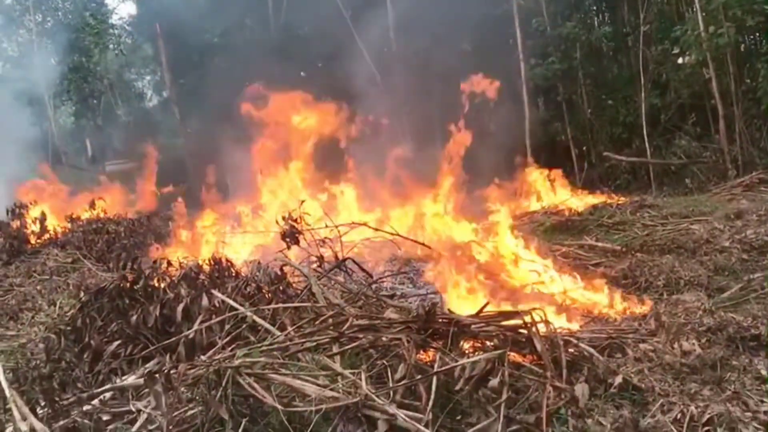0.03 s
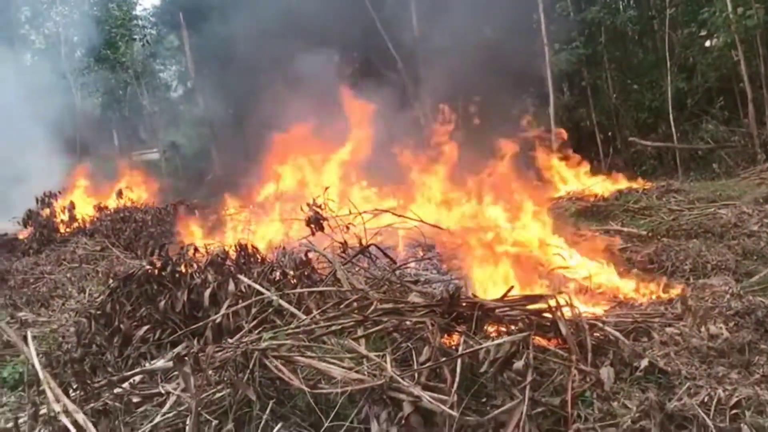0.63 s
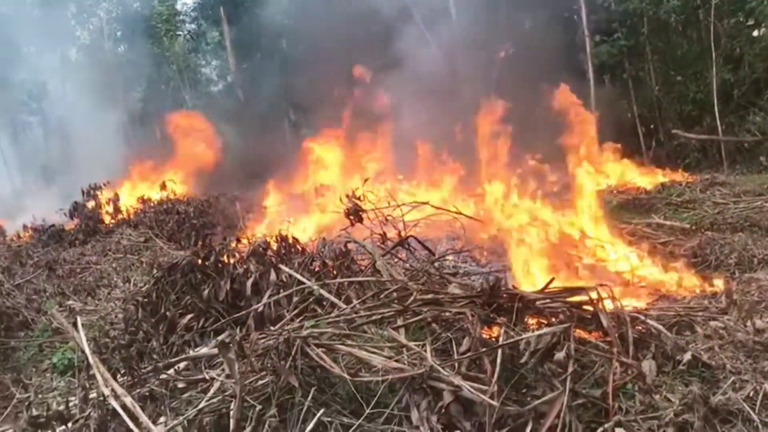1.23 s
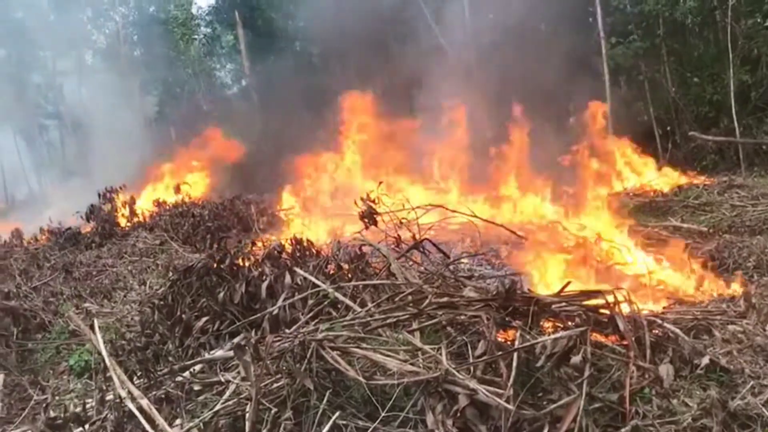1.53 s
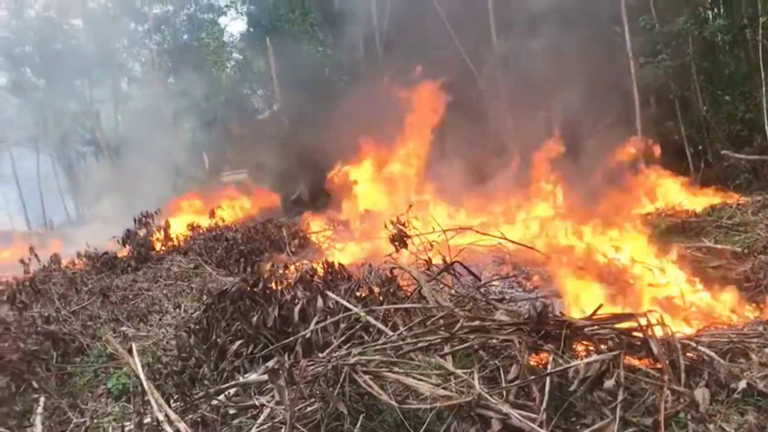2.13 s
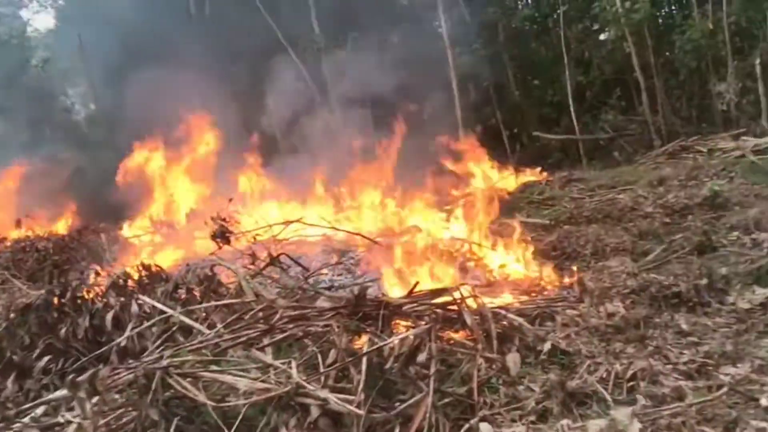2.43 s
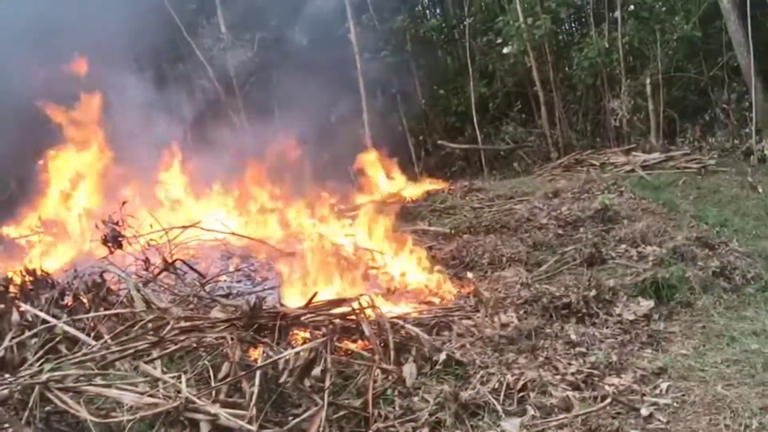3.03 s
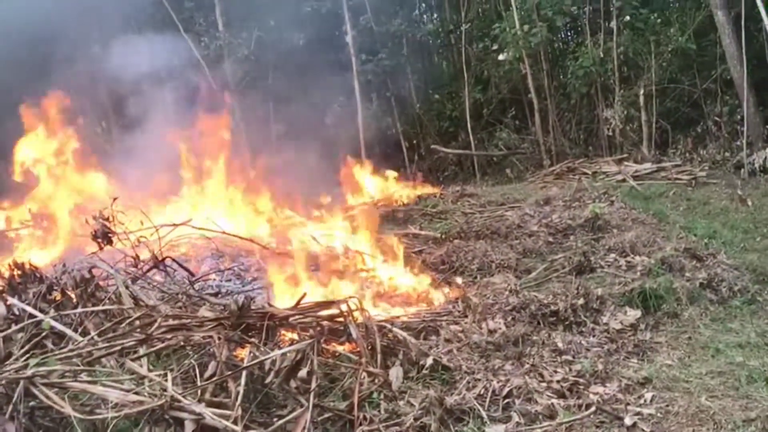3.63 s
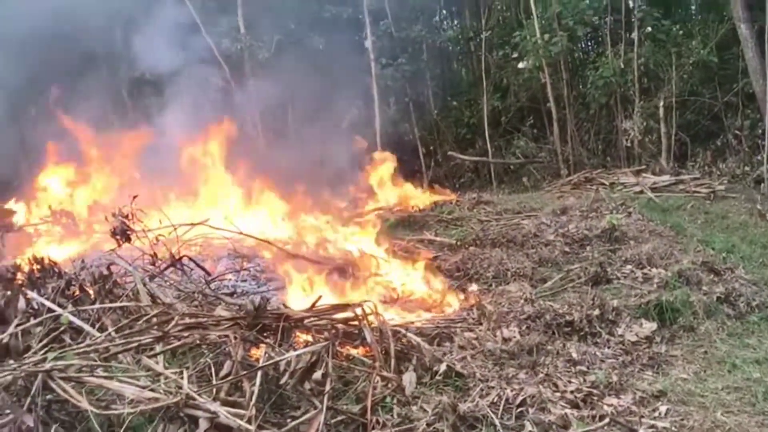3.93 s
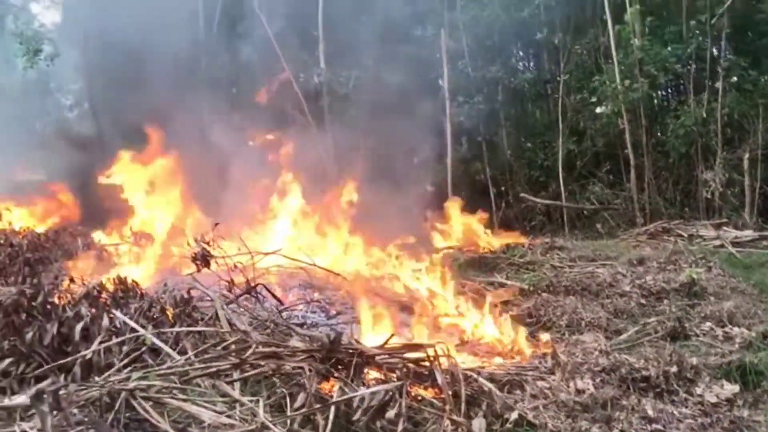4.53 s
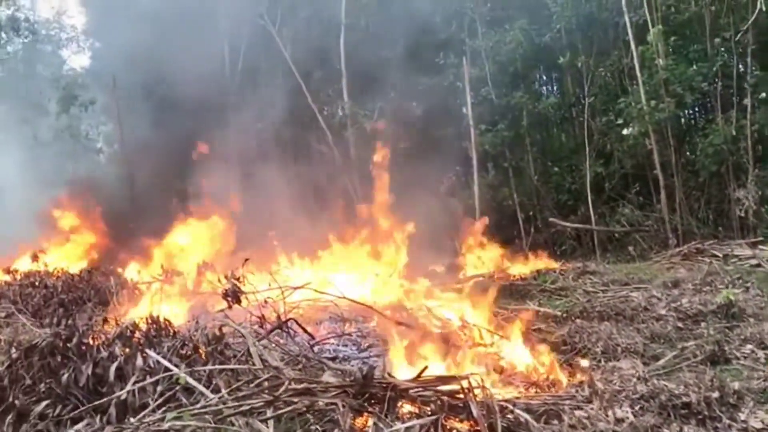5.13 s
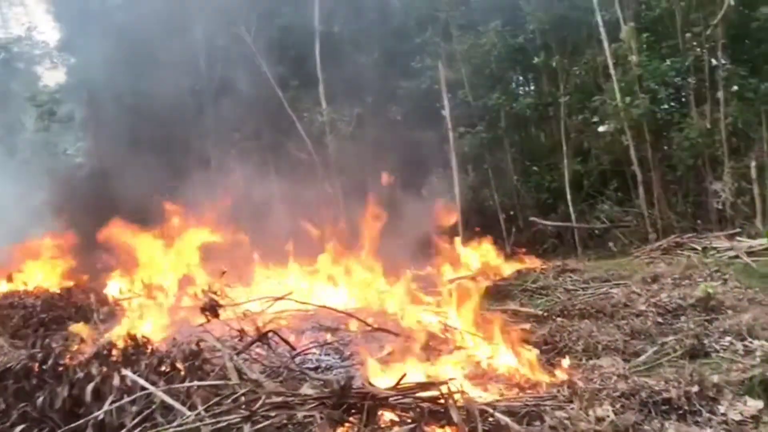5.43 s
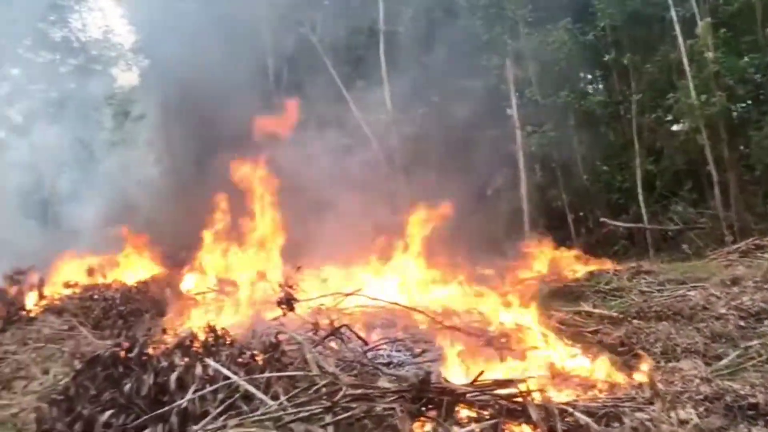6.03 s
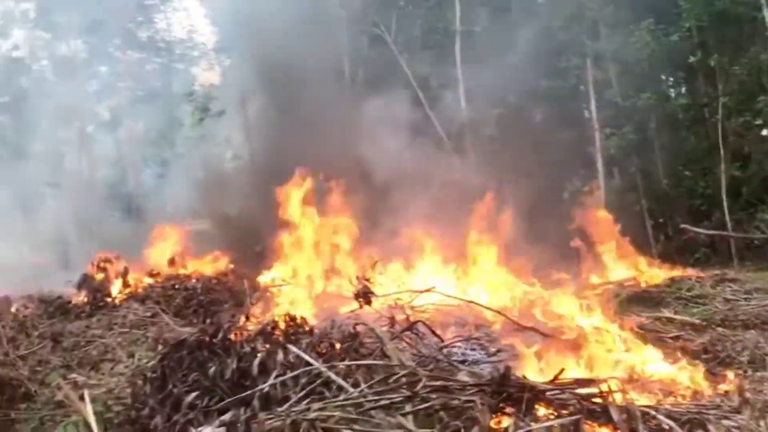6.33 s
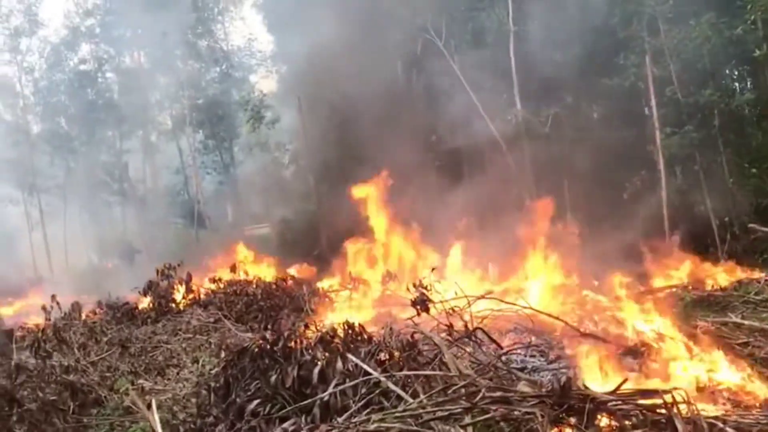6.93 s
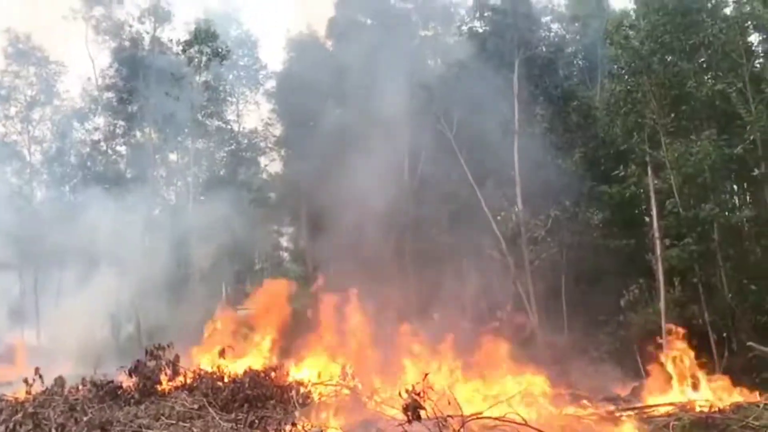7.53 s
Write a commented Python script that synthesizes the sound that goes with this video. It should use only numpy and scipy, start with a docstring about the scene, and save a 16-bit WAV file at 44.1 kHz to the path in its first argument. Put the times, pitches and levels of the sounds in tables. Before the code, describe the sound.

A large pile of dry branches burns in an open clearing, heard from a few metres away for about eight seconds. From start to finish the flames give a low, steady roar beneath a bright, flickering hiss, with thin, high spurts of boiling sap. Leaves sizzle and tick, and twigs crackle in dense, uneven clumps. Small dry pops are scattered throughout, several each second. A stronger pop comes at about 0.9 seconds, then the loudest, a quick double crack, at 1.8 seconds. The pops are lighter from around 3 to 4 seconds, until a sharp, bright snap at 4.4. A clear pop follows near 5.1, another loud, bright snap at 7.3 and a smaller one at 7.7. Each is very short, with only a faint, dull reflection from the surrounding trees. The fire keeps an even strength to the end.

```python
"""A large pile of dry branches burns in an open clearing, a few metres away.
Turbulent flames roar low, gas and boiling sap hiss out of the wood, and countless leaves and twigs
crackle as their fibres break. Now and then a steam pocket bursts with a sharp pop that scatters
through the pile and off the trees."""
import sys
import numpy as np
from scipy import signal
from scipy.fft import rfft, irfft
from scipy.io import wavfile

SR = 44100
rng = np.random.default_rng(int(sys.argv[2]) if len(sys.argv) > 2 else 0)


def wav_record(signal):
    """Record a signal, one row per channel, as 16-bit PCM in the file named by sys.argv[1]."""
    frames = np.transpose(np.atleast_2d(signal))
    bounded = np.clip(frames, -1, 1)
    # unit amplitude maps onto the largest positive 16-bit level
    quanta = np.round(bounded * 32767).astype(np.int16)
    wavfile.write(sys.argv[1], SR, quanta)


N = 343980  # 7.8 s


def from_db(db):
    """Decibels to gain."""
    return 10 ** (np.asarray(db) / 20)


def rms_one(x):
    """Scale to rms 1."""
    return x / np.sqrt(np.mean(x ** 2) + 1e-20)


def energy_one(x):
    """Scale so that the squares sum to 1."""
    return x / np.sqrt(np.sum(x ** 2) + 1e-20)


def drift(rate_hz):
    """A smooth random wobble with rms 1, moving mostly below rate_hz."""
    hz = np.fft.rfftfreq(N, 1 / SR)
    return rms_one(irfft(rfft(rng.standard_normal(N)) / (1 + (hz / rate_hz) ** 2), N))


def coloured_noise(spectrum):
    """Steady noise shaped by an EQ curve; rms 1."""
    hz, db = np.transpose(spectrum)
    bin_hz = np.maximum(np.fft.rfftfreq(N, 1 / SR), 1)
    gain = from_db(np.interp(np.log(bin_hz), np.log(hz), db))
    return rms_one(irfft(rfft(rng.standard_normal(N)) * gain, N))


def resonate(x, hz, q):
    """A band-pass resonance: at low Q a click comes out as a pulse of one or two swings."""
    w = 2 * np.pi * min(hz, .45 * SR) / SR
    damp = np.sin(w) / (2 * max(q, .2))
    return signal.lfilter([damp, 0, -damp], [1 + damp, -2 * np.cos(w), 1 - damp], x + 1e-18)


def soften(x, hz, kind="low"):
    """A gentle low- or high-pass."""
    return signal.sosfilt(signal.butter(1, min(hz, .45 * SR), kind, fs=SR, output="sos"), x)


def equalise(x, bands):
    """Boost or cut a few bell-shaped bands."""
    for hz, width_hz, gain_db in bands:
        x = x + (from_db(gain_db) - 1) * resonate(x, hz, hz / width_hz)
    return x


def scatter(t60):
    """A spray of tiny reflections that falls 60 dB in t60 seconds; energy 1."""
    t = np.arange(SR // 4) / SR
    return energy_one(rng.standard_normal(len(t)) * from_db(-60 * t / t60) * (t > 0))


# The bass-heavy colour of the flames. Each row: frequency in Hz, relative level in dB.
FLAME_COLOUR = [(12, -42), (22, -28), (35, -10.5), (50, -0.5), (68, 0), (100, -3), (130, -6), (165, -6),
                (235, -11.5), (290, -17.5), (420, -21.5), (900, -68)]


def roar(level_db, flutter_db):
    """Turbulent flames: deep noise that flutters as the tongues tear off."""
    return from_db(level_db + flutter_db * drift(13)) * coloured_noise(FLAME_COLOUR)


# The colour of the escaping gas. Each row: frequency in Hz, relative level in dB.
GAS_COLOUR = [(150, -11), (330, -7), (500, -2), (750, -3), (1050, -4), (2000, -1), (3600, 1.6), (6000, 0.8),
              (9000, 0.9), (12500, 0.7), (16000, 1.5)]


def hiss(level_db, flicker_db):
    """Many small gas jets blend into a bright, flickering hiss."""
    return from_db(level_db + flicker_db * drift(56)) * coloured_noise(GAS_COLOUR)


def steam(level_db, hz, q, spurt_db, spurt_rate_hz):
    """Sap boils out of the wood in short, high spurts."""
    jet = resonate(resonate(rng.standard_normal(N), hz, q), hz, q)
    spurts = from_db(spurt_db * np.minimum(drift(spurt_rate_hz), 2))
    return from_db(level_db) * rms_one(jet * spurts)


def crackle(per_s, low_hz, high_hz, q, spread_db, clump_db, scatter_db, scatter_t60, groups=12):
    """Fibres crack in random clumps, most of them tiny; each group has its own pitch and path. rms 1."""
    cracks = rng.random(N) < per_s * from_db(clump_db * drift(25)) / SR
    sizes = from_db(spread_db * np.minimum(rng.exponential(1, N), 4))
    clicks = cracks * sizes * rng.choice([-1, 1], N)
    group = rng.integers(0, groups, N)
    out = np.zeros(N)
    for k, hz in enumerate(np.geomspace(low_hz, high_hz, groups)):
        path = from_db(scatter_db) * scatter(scatter_t60)[:SR // 20]
        path[0] = 1  # the direct sound leads its reflections
        snap = energy_one(resonate(path, hz, q))
        out += signal.oaconvolve(clicks * (group == k), snap)[:N]
    return rms_one(out)


def twig_ring(x, ring_db, hz=3710, q=2.2):
    """A cracking twig rings briefly at the main resonance of dry wood: boost or cut that band."""
    return equalise(x, [(hz, hz / q, ring_db)])


# The featured pops of the wood. Each row: start in seconds, relative level in dB, pitch in Hz,
# sharpness as Q, boost or cut of the twig's ring in dB.
WOOD_POPS = [(0.1072, -21, 1550, 0.54, -2), (0.1579, -8, 4080, 1.2, 4), (0.3685, -12, 5260, 0.2, 8),
             (0.394, -11, 2260, 0.6, 3), (0.4044, -14.5, 430, 0.7, 4), (0.4191, -10.5, 2480, 0.78, -3),
             (0.4842, -10, 4700, 1.8, -5), (0.5333, -13.5, 3970, 2.2, 6), (0.6037, -10.5, 1900, 0.18, -3),
             (0.776, -10.5, 6360, 0.2, 10), (0.877, -3, 2820, 1.8, -3), (1.0607, -12, 4790, 1.2, 14),
             (1.0751, -13, 3610, 0.36, -5), (1.1003, -18, 1170, 0.99, -3), (1.1514, -12, 2720, 2.2, 7),
             (1.2933, -16.5, 600, 0.27, 10), (1.361, -8, 3950, 1.2, 0), (1.3708, -14, 5260, 1, 6),
             (1.395, -10.5, 3290, 0.41, -9), (1.7988, 3, 2400, 0.28, 7.5), (1.8188, -2.4, 1600, 0.55, 0),
             (1.9122, -8, 10180, 0.33, -1), (1.9509, -9.5, 4360, 2, 4), (2.0791, -7.5, 2080, 0.7, 5),
             (2.1017, -13, 2040, 0.19, -6), (2.1339, -9.5, 3970, 0.19, 5), (2.1488, -13, 3970, 0.91, 4),
             (2.2595, -9.5, 6360, 0.19, -1), (2.3098, -13.5, 2000, 0.28, -2),
             (2.331, -11.5, 3610, 0.56, -3), (2.4484, -18.5, 1410, 2.2, -4), (2.4888, -13, 2200, 0.27, -1),
             (2.6053, -14.5, 7670, 0.23, 8), (2.8024, -12, 13500, 0.88, 8), (2.9201, -9.5, 4790, 0.17, -6),
             (3.0447, -26, 500, 1.1, 3), (3.2574, -16, 2720, 0.67, -9), (3.4136, -12.5, 2480, 0.4, 14),
             (3.5786, -12, 4790, 0.66, 2), (3.7754, -10, 3970, 0.3, 7), (4.371, -1.5, 8000, 0.16, 10.5),
             (4.374, -17, 320, 0.56, -4), (4.3845, -17, 2480, 0.3, -2), (4.4957, -8.5, 5000, 1.1, -3),
             (4.754, -15.5, 6980, 0.3, 17), (4.8793, -14, 3600, 0.45, -1), (5.0775, -5.5, 2000, 0.7, 0),
             (5.1317, -9, 2400, 0.39, -1), (5.193, -13.5, 4790, 0.3, 11), (5.4041, -11, 2740, 2.9, 2),
             (5.5271, -7, 8430, 0.45, -2), (5.561, -12, 2260, 0.34, -3), (5.6554, -12, 12290, 0.48, 4),
             (5.7893, -14, 11180, 0.34, 3), (5.9786, -11, 3970, 0.44, 3), (6.0612, -13, 12290, 1.3, 0),
             (6.5537, -11.5, 4790, 0.79, 3), (6.6053, -9.5, 2990, 1.2, 1), (6.7139, -13.5, 1060, 1.4, 4),
             (6.9306, -8.5, 2400, 0.37, -4), (6.932, -11, 2200, 0.3, -1), (7.1034, -13, 9260, 0.2, 22),
             (7.1268, -10, 2450, 0.86, -9), (7.3177, -0.2, 8600, 0.3, 15), (7.6832, -6.5, 7670, 0.33, 23),
             (7.7399, -10.5, 2400, 0.49, -2)]


def pops(extra_rows, near_t60, far_t60, far_db, tear_t60, tear_db):
    """A steam pocket bursts in one pressure pulse; splinters and nearby branches add a short trail."""
    out = np.zeros(N + SR)
    for start_s, level_db, hz, q, ring_db in [*WOOD_POPS, *extra_rows]:
        reflections = energy_one(scatter(near_t60) + from_db(far_db) * scatter(far_t60))
        # the first fibre to give way takes its neighbours with it
        click = from_db(tear_db) * scatter(tear_t60)
        click[0] = 1
        # a bigger pocket opens more slowly, so its pulse is lower and has a softer edge
        burst = resonate(np.array([click, reflections]), hz, q)
        burst = soften(burst, 2.8 * hz)
        burst = soften(burst, hz=110, kind="high")
        pulse, trail = twig_ring(burst, ring_db)
        # a faint pop lies deeper in the pile, so more of it is scattered
        trail_db = -10.5 - 0.5529 * level_db
        pop = energy_one(pulse) + from_db(trail_db) * energy_one(trail)
        at = round(start_s * SR)
        out[at:at + len(pop)] += from_db(level_db) * pop
    return out[:N]


def small_pop_rows(per_s):
    """Cues for the lesser bursts that come at random all over the pile, most of them small and high."""
    chance = rng.random((round(per_s * N / SR), 5)).T
    start_s = chance[0] * N / SR
    bell = np.log(chance[1:] / (1 - chance[1:])) * np.sqrt(3) / np.pi  # bell-shaped, spread 1
    size, pitch, sharpness, ring = np.clip(bell, -2, 2)
    hz = np.minimum(5350 * 2 ** (1.15 * pitch), 13500)
    # thick sticks lie deep, so their low knocks are muffled: 2 dB per octave below 2800 Hz
    muffled_db = 2 * np.maximum(np.log2(2800 / hz), 0)
    level_db = -17.5 + 1.9 * size - muffled_db
    q = 0.63 * 2 ** (0.95 * sharpness)
    ring_db = 4.5 + 7 * ring
    return np.transpose([start_s, level_db, hz, q, ring_db])


# The tone of the pile. Each row: centre in Hz, width in Hz, gain in dB.
PILE_BANDS = [(730, 260, 0.5), (6200, 5300, -0.5), (13500, 12000, 4.5)]


def pile_tone(bursts):
    """The pile gives every burst a slightly hollow body and a dry top edge."""
    return equalise(bursts, PILE_BANDS)


def smear(x, hz, q):
    """On its way out of the pile a pulse keeps its colour but swings to and fro once more."""
    return x - 2 * resonate(x, hz, q)


def clearing(x, echo_db, t60, dull_hz):
    """The edge of the forest returns a faint, dull wash."""
    reflections = soften(scatter(t60), dull_hz)
    return x + from_db(echo_db) * signal.oaconvolve(x, reflections)[:N]


# How hard the fire burns, as two fader rides. Each row: time in seconds, base level in dB of the
# gas and leaves, base level in dB of the twigs.
BLAZE_FADERS = [(0.0, -42.5, -39.5), (0.22, -43, -49.5), (0.56, -42, -46.5), (1.8, -42, -47),
                (2.3, -43, -44.5), (2.63, -44, -46), (3.34, -42, -47), (4.06, -44, -47), (4.58, -41.5, -46),
                (5.19, -43.5, -50.5), (5.49, -42, -45), (6.06, -41.5, -49), (6.39, -44, -46.5),
                (6.69, -42, -44), (7.04, -43.5, -47.5), (7.23, -42.5, -42), (7.8, -42, -53)]


def scene():
    """Over a steady roar, hiss and three sizes of crackle follow the blaze; the pops stand out."""
    times, *faders = np.transpose(BLAZE_FADERS)
    gas_db, twig_db = [np.interp(np.arange(N) / SR, times, fader) for fader in faders]
    twigs = crackle(per_s=330, low_hz=910, high_hz=5300, q=0.98,
                    spread_db=4, clump_db=4, scatter_db=-3.5, scatter_t60=0.012)
    twigs = from_db(twig_db - 3.5) * twig_ring(twigs, ring_db=2)
    # leaves deep in the pile sizzle; those at its near edge tick one by one
    sizzle = crackle(per_s=1000, low_hz=3970, high_hz=14000, q=1.8,
                     spread_db=1.5, clump_db=5, scatter_db=6, scatter_t60=0.045)
    ticks = crackle(per_s=36, low_hz=5970, high_hz=15000, q=1.4,
                    spread_db=4.5, clump_db=3, scatter_db=1, scatter_t60=0.017)
    leaves = from_db(gas_db - 4.5) * sizzle + from_db(gas_db - 9) * ticks
    bursts = pops(small_pop_rows(per_s=9), near_t60=0.0087, far_t60=0.049, far_db=-0.5,
                  tear_t60=0.0031, tear_db=-9.5)
    wood = twigs + leaves + from_db(0.28) * pile_tone(bursts)
    wood = smear(wood, hz=3800, q=0.67)
    wood = clearing(wood, echo_db=-13.5, t60=0.29, dull_hz=6100)
    gas = hiss(gas_db + 0.74, flicker_db=1.52)
    sap = steam(gas_db - 12, hz=12400, q=0.91, spurt_db=8.5, spurt_rate_hz=19)
    flames = roar(level_db=-48.5, flutter_db=0.6)
    return (wood + gas + sap + flames)[None]


# Dips from the ground bounce (low) and the microphone's port (high).
# Each row: centre in Hz, width in Hz, gain in dB.
GROUND_AND_PORT_DIPS = [(790, 170, -2), (1980, 640, -1.5), (4935, 770, -3.5), (7650, 500, -3.5),
                        (10450, 1470, -4.5)]


def record(dry):
    """Ground bounce and port carve shallow dips; a steep low-pass cuts the top above 15.8 kHz."""
    top_cut = signal.ellip(10, .1, 70, 15800, fs=SR, output="sos")
    return signal.sosfilt(top_cut, equalise(dry, GROUND_AND_PORT_DIPS))


dry = scene()
out = record(dry)
wav_record(out)
```